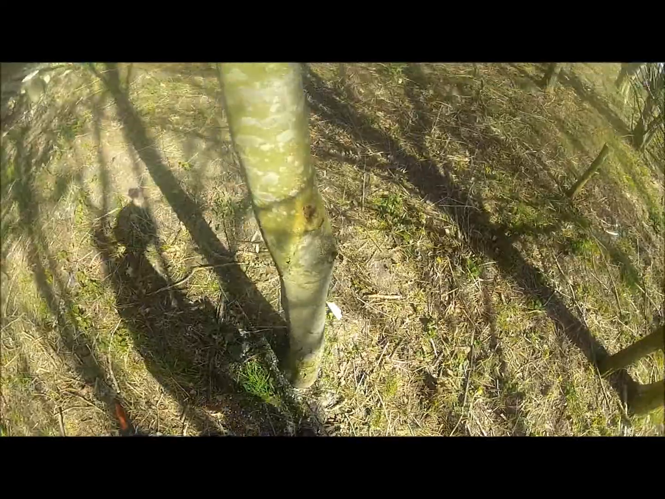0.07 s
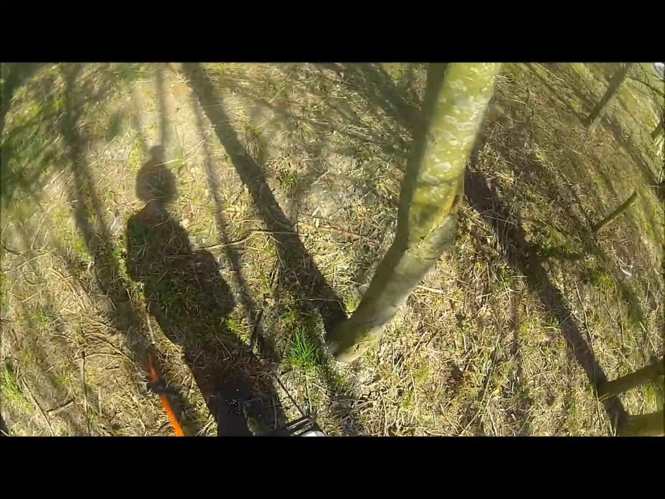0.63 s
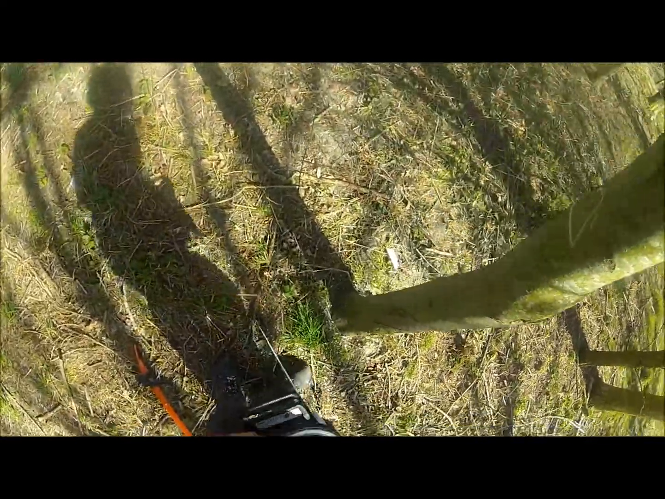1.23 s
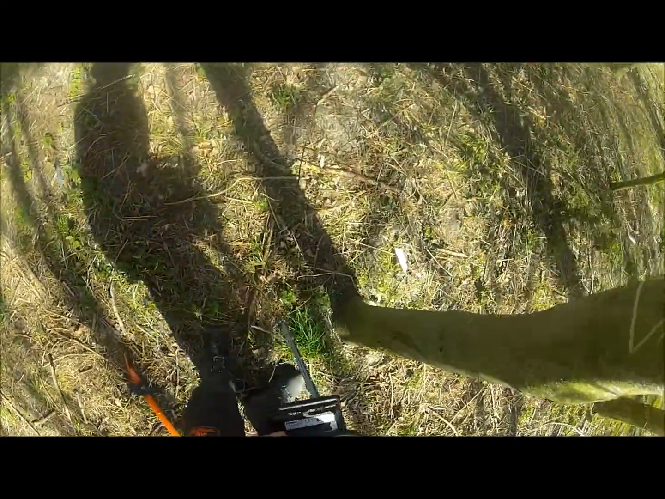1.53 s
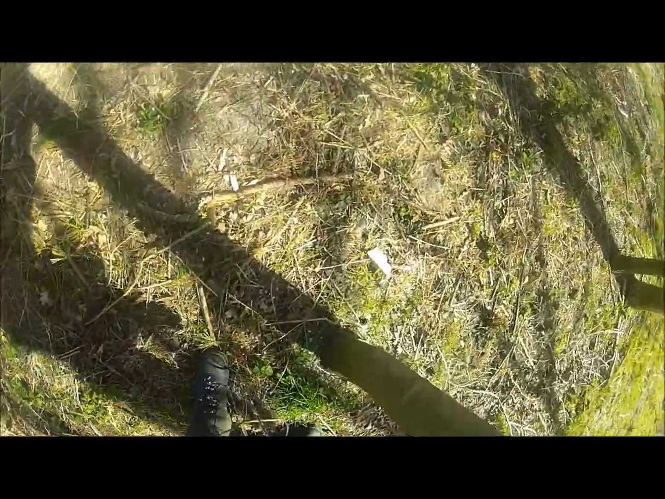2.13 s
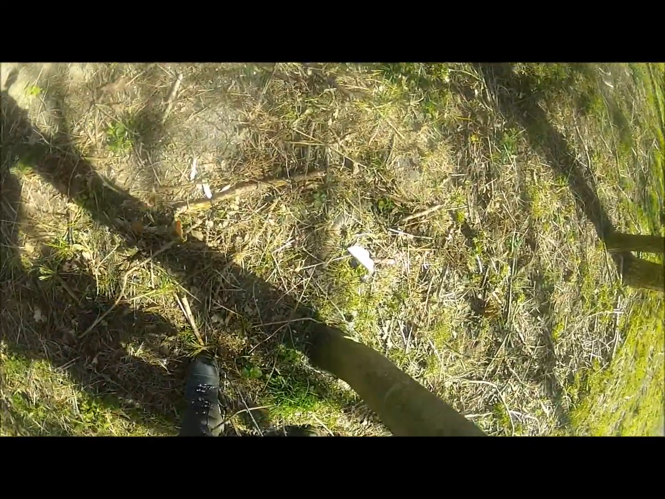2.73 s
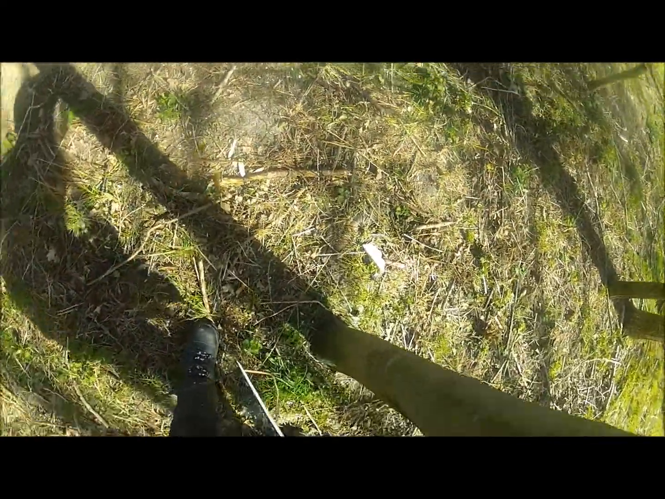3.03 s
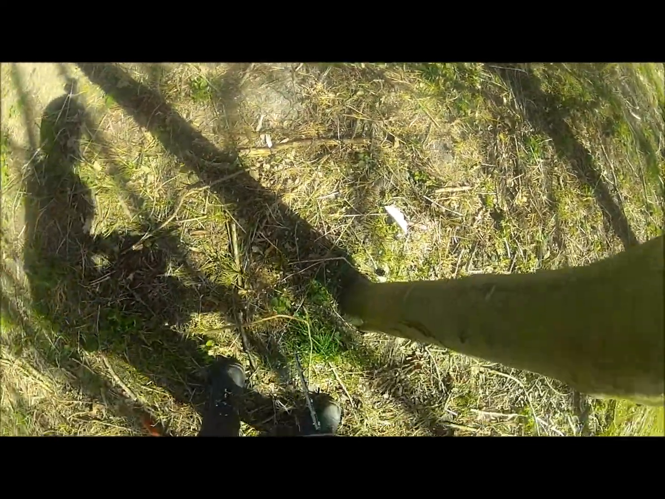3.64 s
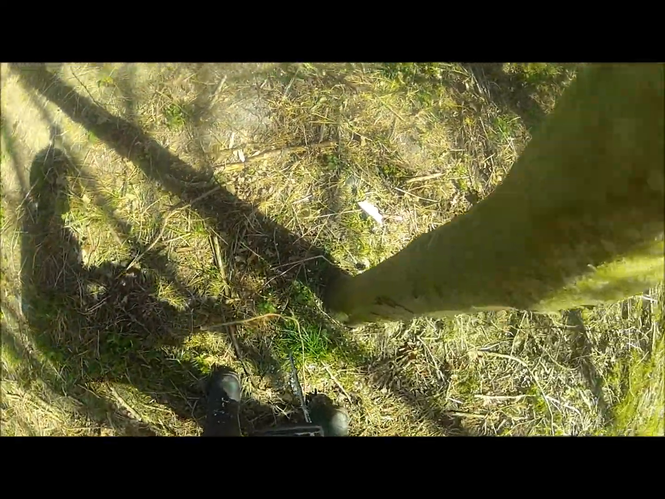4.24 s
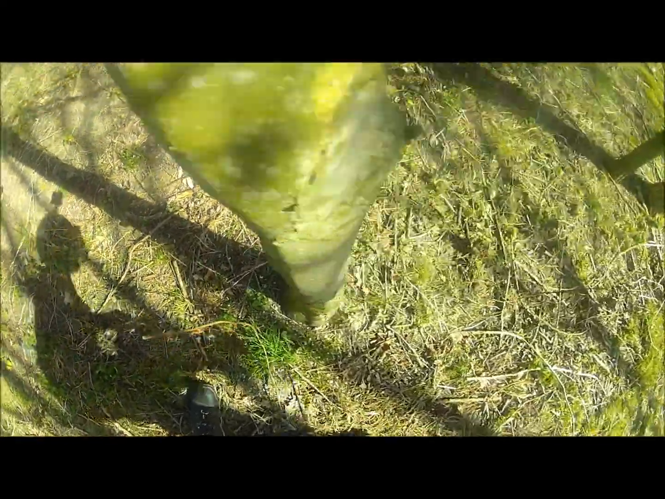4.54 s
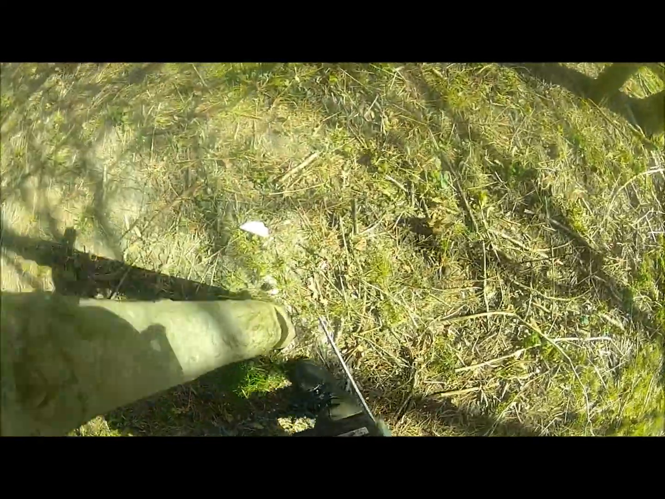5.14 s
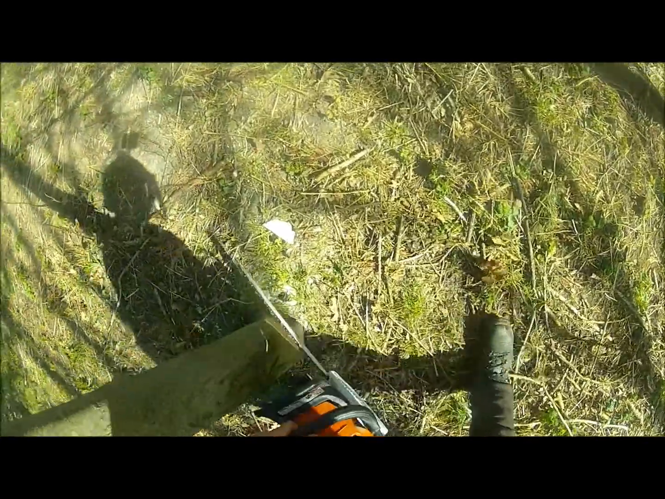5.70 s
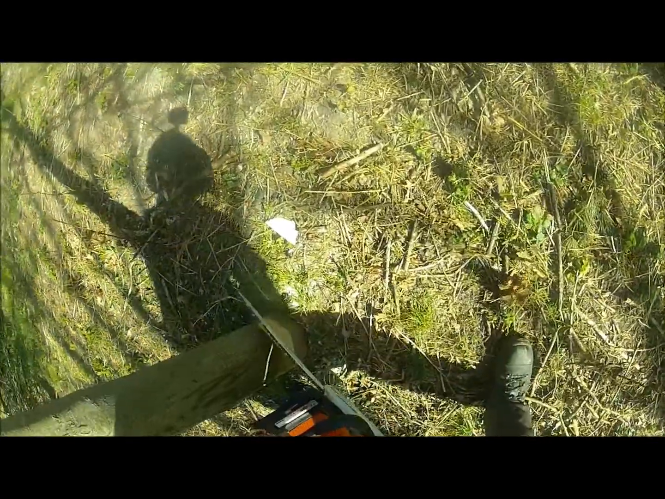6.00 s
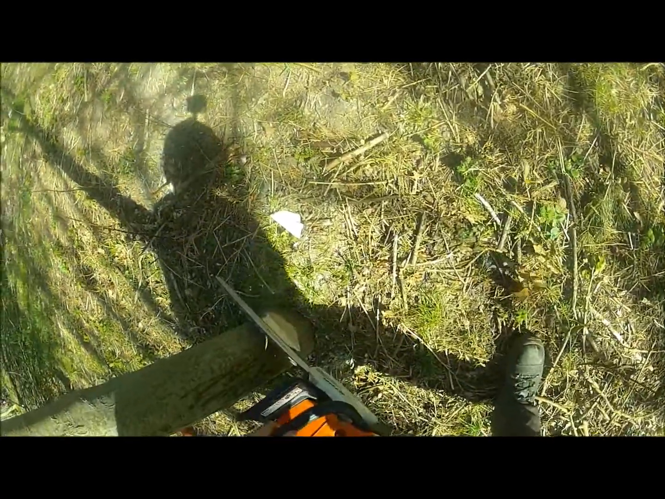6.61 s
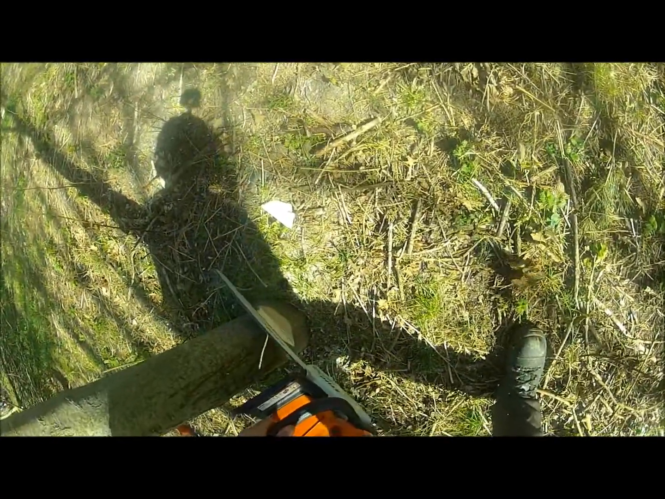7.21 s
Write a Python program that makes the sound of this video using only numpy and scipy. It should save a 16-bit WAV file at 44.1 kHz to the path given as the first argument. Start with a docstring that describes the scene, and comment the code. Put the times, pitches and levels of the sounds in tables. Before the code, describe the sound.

A two-stroke chainsaw idles close by in the open, puffing unevenly with a metallic rattle and occasional slaps of its slack chain. The body-worn microphone picks up a few dull bumps and one sharp snap of its plastic case. After about six seconds the throttle opens and the engine climbs to a loud, high buzz, the teeth just meeting a tree trunk at the end. There is no echo.

```python
"""Chainsaw idling, then cutting

A two-stroke chainsaw idles in the open, firing only every few turns and rattling on each one.
A body-worn camera is jostled and its plastic case snaps as the operator crouches at a trunk.
Then the throttle opens, the engine fires on every turn and the chain races into the wood."""
import sys
import numpy as np
from scipy import signal
from scipy.fft import rfft, irfft
from scipy.io import wavfile
from scipy.ndimage import uniform_filter1d

SR = 44100
rng = np.random.default_rng(int(sys.argv[2]) if len(sys.argv) > 2 else 0)


def generate_wav(sig):
    """Save sig (samples, or channels by samples) to the path in sys.argv[1] as 16-bit PCM at SR."""
    pcm = np.round(np.clip(np.atleast_2d(sig).T, -1, 1) * 32767).astype(np.int16)
    wavfile.write(sys.argv[1], SR, pcm)


N = 320166
TIME = np.arange(N) / SR
CUTOFF_HZ = 15500
PART_THROTTLE_S, FULL_THROTTLE_S = 6.19, 6.511
TOP_SPEED_HZ = 231.3  # engine turns per second


def from_db(db):
    """Turn decibels into a number to multiply by."""
    return 10 ** (np.asarray(db) / 20)


def in_time(rows):
    """Draw each column of a table as a line through time, one value per sample."""
    times, *columns = np.transpose(rows)
    return [np.interp(TIME, times, column) for column in columns]


def evened(x, size=6001):
    """Hold the average (rms) level at one, over a sliding window of size samples."""
    return x / np.sqrt(np.abs(uniform_filter1d(x * x, size)) + 1e-12)


def clicks(times, heights):
    """Single clicks, each shared between the two nearest samples."""
    at = np.clip(np.asarray(times) * SR, 0, N - 2)
    whole = at.astype(int)
    late = at - whole
    return np.bincount(whole, heights * (1 - late), N) + np.bincount(whole + 1, heights * late, N)


def fade(x, decay_s):
    """Give each click a tail that dies away."""
    return signal.lfilter([1], [1, -np.exp(-1 / (decay_s * SR))], x + 1e-18)


def ring(x, pitch_hz, ring_s):
    """Each click starts a pure tone that falls by 60 dB in ring_s."""
    keep = from_db(-60 / (ring_s * SR))
    step = 2 * np.pi * pitch_hz / SR
    return signal.lfilter([0, np.sin(step)], [1, -2 * keep * np.cos(step), keep * keep], x + 1e-18)


def colour(x, tone, resonances=(), size=8192):
    """Filter a sound by a tone curve (how strong each pitch is), plus extra peaks and dips."""
    hz = np.maximum(np.arange(size // 2 + 1) * SR / size, 1)
    points, levels = np.transpose(tone)
    db = np.interp(np.log(hz), np.log(points), levels)
    for centre, width, height in resonances:
        db = db + height * np.exp(-((hz - centre) / width) ** 2)
    # a minimum-phase filter: it rings after a hit, never before
    cepstrum = irfft(np.log(from_db(db)))[:size // 2]
    cepstrum[1:] *= 2
    response = irfft(np.exp(rfft(cepstrum, size)))[:size // 2]
    return signal.oaconvolve(x, response / np.abs(response).max())[:N]


def grit(spread_db):
    """Noise made of tiny impacts of uneven size."""
    noise = rng.standard_normal(N)
    sizes = np.repeat(rng.standard_normal(N // 8 + 1), 8)[:N]
    noise *= from_db(spread_db * sizes)
    return noise / noise.std()


def shower(envelope, tone, resonances=()):
    """Tiny impacts ring through a body; the envelope says how loud they are at each moment."""
    noise = grit(spread_db=-0.5)
    return colour(envelope * noise, tone, resonances) / colour(noise, tone, resonances).std()


def breeze(level_db=-60, band_hz=(20, 105)):
    """Moving air makes a faint rumble, different on the left and the right."""
    band = signal.butter(3, band_hz, "band", fs=SR, output="sos")
    air = signal.sosfilt(band, rng.standard_normal((2, N)))
    return from_db(level_db) * air / air.std()


# Heavy moves that rock the camera mount: start_s, level_db
SWAYS = [(4.70, -32), (5.797, -27)]


def sway(pitch_hz=46, ring_s=0.2):
    """The mount rocks on its strap with a deep thud."""
    start_s, level_db = np.transpose(SWAYS)
    return -ring(clicks(start_s, from_db(level_db)), pitch_hz, ring_s)


# Dull bumps on the mount: start_s, level_db, decay_s
BUMPS = [(.835, -30, 0.089), (2.736, -21.5, 0.036), (3.513, -23, 0.02), (4.694, -17, 0.016),
         (5.736, -19.5, 0.035), (5.781, -25, 0.025), (5.872, -22.5, 0.02)]
# The note of the bumped mount: pitch_hz, level_db, ring_s
MOUNT_NOTES = [(191, -8, 0.071)]
# Tone of a scuff on the mount: pitch_hz, level_db
SCUFF_TONE = [(15, -19), (43, -20), (70, -9), (110, -5), (140, -6.5), (195, 5), (240, -16.5), (400, -26.5),
              (1000, -18), (2000, -50)]
# Low rustle as the operator moves: time_s, level_db
RUSTLE_LEVELS = [(0, -49), (2.8, -47.5), (3.9, -52.5), (6.5, -46)]
# Tone of that rustle: pitch_hz, level_db
RUSTLE_TONE = [(12, -9), (22, -4.5), (42, -2), (70, -12.5), (107, -7), (140, -14), (195, -3), (235, -12.5),
               (500, -15.5), (1200, -59)]


def mount(scuff_gain_db=-8, ring_gain_db=-3, rustle_gain_db=0.5, push_delay_s=0.00635):
    """Bumps make the camera mount ring and scuff, over a low rustle that travels through it."""
    start_s, level_db, _ = np.transpose(BUMPS)
    pushes = clicks(start_s + push_delay_s, from_db(level_db + ring_gain_db))
    rings = sum(from_db(db) * ring(pushes, hz, ring_s) for hz, db, ring_s in MOUNT_NOTES)
    rubbing = sum(from_db(db) * fade(clicks([s], 0.65), decay_s) for s, db, decay_s in BUMPS)
    rustle = from_db(in_time(RUSTLE_LEVELS)[0]) * evened(colour(rng.standard_normal(N), RUSTLE_TONE))
    scuffs = shower(rubbing, SCUFF_TONE)
    return rings + from_db(scuff_gain_db) * scuffs + from_db(rustle_gain_db) * rustle


# Snaps of the plastic case: start_s, level_db
SNAPS = [(2.7427, -22), (4.7005, -29), (5.7536, -0.5), (5.7818, -11.5)]
# The notes the case rings with: pitch_hz, level_db, ring_s
CASE_NOTES = [(1170, -10, 0.0037), (1780, 5.5, 0.0096), (2270, -1.5, 0.0076), (5660, -9.5, 0.0017),
              (10080, -11.5, 0.016), (13730, -13, 0.0094)]


def case_snaps(gain_db=-5):
    """Each snap rings the plastic case; neighbouring notes start in opposite directions."""
    start_s, level_db = np.transpose(SNAPS)
    hits = clicks(np.round(start_s * SR) / SR, from_db(level_db + gain_db))
    return sum((-1) ** k * from_db(db) * ring(hits, hz, ring_s)
               for k, (hz, db, ring_s) in enumerate(CASE_NOTES))


def engine_speed(idle_hz=50.68, sag_hz_per_s=0.44, part_speed_hz=70.5, run_up_s=0.61, flywheel_s=0.08):
    """Turns per second: a wandering, sinking idle, a small squeeze of the trigger, then full speed."""
    wander = 1.03 * np.cos(2 * np.pi * (TIME - 0.164) / 0.965)
    stumble = 2.6 * np.exp(-((TIME - 3.73) / 0.28) ** 2)  # the engine slows once and recovers
    idle = idle_hz - sag_hz_per_s * TIME + wander - stumble
    squeezed = np.clip((TIME - PART_THROTTLE_S) / 0.17, 0, 1)
    run_up = 1 - np.clip(1 - (TIME - FULL_THROTTLE_S) / run_up_s, 0, 1) ** 2
    run_up = uniform_filter1d(run_up, int(flywheel_s * SR))  # the flywheel's weight rounds off the speed-up
    return idle + (part_speed_hz - idle) * squeezed + (TOP_SPEED_HZ - part_speed_hz) * run_up


def clutch_grip(take_up_s=0.35):
    """How firmly the clutch pulls the chain along, from 0 to 1."""
    return np.clip((TIME - PART_THROTTLE_S) / take_up_s, 0, 1)


# The strongest firings of the idling engine: start_s, level_db
FIRINGS = [(.145, -36), (.418, -41), (1.181, -42), (1.666, -43.5), (1.983, -40), (2.138, -38),
           (2.356, -36.5), (2.436, -37), (2.745, -37), (3.064, -40), (3.223, -38), (3.43, -41),
           (3.626, -41.5), (3.716, -39), (4.005, -36.5), (4.271, -40.5), (4.435, -38.5), (4.645, -35.5),
           (5.019, -42), (5.557, -43.5), (5.847, -38), (6.008, -40), (6.091, -38), (6.283, -36)]


def idle_firings(turns, weak_gap_s=0.08, strong_gain_db=2, weak_db=-45, spread_db=1.0):
    """One click per idle firing: between the strong ones, every few turns fire weakly."""
    strong_s, strong_db = np.transpose(FIRINGS)
    weak_s = np.concatenate([np.linspace(a, b, max(round((b - a) / weak_gap_s), 1) + 1)[1:-1]
                             for a, b in zip([0, *strong_s], strong_s)])
    weak_s = turns[np.abs(turns - weak_s[:, None]).argmin(axis=1)]  # move each to the nearest turn
    weak = clicks(weak_s, from_db(weak_db + spread_db * rng.standard_normal(len(weak_s))))
    return clicks(strong_s, from_db(strong_db + strong_gain_db)) + weak


def turn_times(speed, surge=0.0801):
    """When each turn begins; a strong firing kicks the crankshaft ahead, then it coasts."""
    start_s, level_db = np.transpose(FIRINGS)
    kick = fade(clicks(start_s, from_db(level_db - level_db.mean())), decay_s=0.05)
    kick -= uniform_filter1d(kick, size=7001)
    count = np.cumsum(speed * (1 + surge * kick * (TIME < FULL_THROTTLE_S))) / SR
    # make every strong firing start a turn
    offsets = np.unwrap(np.interp(start_s, TIME, count) % 1, period=1)
    count -= np.interp(TIME, start_s, offsets)
    return np.interp(np.arange(1, int(count[-1]) + 1), count, TIME)


def knocks(turns, speed, phase, spread_db, jitter):
    """One uneven click per turn; phase (its delay) and jitter (its scatter) are shares of a turn."""
    turn_s = 1 / np.interp(turns, TIME, speed)
    timing, strength = rng.standard_normal((len(turns), 2)).T
    return clicks(turns + turn_s * (phase + jitter * timing), from_db(spread_db * strength))


# Thump of the air box, where the engine breathes in: time_s, level_db
INTAKE_LEVELS = [(0, -55), (1.1, -51), (5.6, -50.5), (6.1, -57)]
# Tone of that thump: pitch_hz, level_db
INTAKE_TONE = [(30, -14), (48, -7.5), (80, -17.5), (110, -19.5), (170, -22), (250, -5), (330, -1.5),
               (400, -4), (480, -17), (800, -36)]


def intake(turns, speed, load):
    """The air box gives a low thump on every turn, fading as the engine speeds up."""
    gulps = knocks(turns, speed, phase=-0.06, spread_db=1.0, jitter=0.002)
    return from_db(in_time(INTAKE_LEVELS)[0]) * evened(colour(gulps, INTAKE_TONE)) * (1 - load)


# Four notes of the cooling fins and covers: pitch_hz, ring_s, gain_db
PINGS = [(1750, 0.04, -2.5), (2716, 0.025, -2.5), (3546, 0.034, -4.5), (4830, 0.015, -2)]
# Their levels as the saw is turned: time_s, first_db, second_db, third_db, fourth_db
PING_LEVELS = [(0, -46, -62, -59, -57), (2.3, -41.5, -55, -50, -61), (3.3, -49.5, -54.5, -46, -52),
               (4.3, -54, -48, -48, -52), (5.7, -49.5, -43.5, -57, -56)]


def pings(turns, speed, load):
    """At idle the piston's slap rings fins and covers; how the saw is held decides which stands out."""
    out = np.zeros(N)
    for (pitch_hz, ring_s, gain_db), level_db in zip(PINGS, in_time(PING_LEVELS)):
        slaps = knocks(turns, speed, phase=-0.2, spread_db=1.7, jitter=0.0401)
        out += from_db(gain_db + level_db) * evened(ring(slaps, pitch_hz, ring_s))
    return out * (1 - load)


def small_resonances(lowest_hz=5600, width_hz=36, max_height_db=8, count=56):
    """The camera's case adds many narrow peaks, scattered across the treble."""
    places, heights = rng.random((count, 2)).T
    centres = lowest_hz + (CUTOFF_HZ - lowest_hz) * (np.arange(count) + places) / count
    return [(hz, width_hz, max_height_db * share) for hz, share in zip(centres, heights)]


# Idle rattle as the saw is turned: time_s, low_clatter_db, high_clatter_db, sizzle_db
IDLE_RATTLE = [(.88, -43.5, -42.5, -45.5), (2.3, -41, -42, -44), (3.14, -40.5, -41, -43.5),
               (3.65, -44, -43, -45.5), (5.2, -43, -42, -44.5), (6.1, -43, -39.5, -42)]
# How those three grow with speed, one row each: gain_db, full_rise_db, reach_octaves
RATTLE_RISE = [(1.02, 19, 1.1), (-0.52, 18.5, 1.58), (-0.1, 19.5, 1.6)]


def rattle_levels(speed, idle_hz=50, slip=0.41):
    """The rattle's three levels in dB rise with speed and flatten out; a slipping clutch delays this."""
    octaves = np.maximum(np.log2(speed / idle_hz), 0)
    octaves *= 1 - slip * (1 - clutch_grip())
    return [idle_db + gain_db + rise_db * np.tanh(octaves / reach)
            for idle_db, (gain_db, rise_db, reach) in zip(in_time(IDLE_RATTLE), RATTLE_RISE)]


# Tone of the clattering parts: pitch_hz, level_db
CLATTER_TONE = [(250, -32.5), (500, -18), (620, -14.5), (1400, -11), (1700, -1.5), (3000, -5), (4000, -11),
                (4500, -10), (6000, -56.5)]
# Tone of the chain's bright sizzle: pitch_hz, level_db
SIZZLE_TONE = [(2500, -77), (3900, 2), (4500, -2), (9500, 0), (10400, -10.5), (10800, -18.5),
               (13100, -41.5), (14000, -18), (15200, -17.5)]
# Peaks and dips that colour the clatter and sizzle, from the saw's parts and the camera's case:
# pitch_hz, width_hz, height_db
RATTLE_RESONANCES = [(694, 23, 11.5), (940, 99, 6), (1288, 73, -14), (2104, 940, 2.5), (2465, 24, 9),
                     (2720, 86, 5), (3021, 83, 7.5), (3665, 280, 8), (4173, 207, -8), (4774, 200, 11),
                     (5344, 110, 8), (6004, 426, -11), (7270, 127, 6.5), (7800, 250, -11.5),
                     (8240, 136, 3.5), (10210, 380, 6.5), (13770, 2150, 18.5)]


def rattle(turns, speed, load, pulses, firings, shake_db=31, split_hz=2300):
    """Piston, clutch and chain rattle in a burst on each turn; at speed the firing buzzes through them."""
    low_db, high_db, sizzle_db = rattle_levels(speed)
    peaks = RATTLE_RESONANCES + small_resonances()
    piston = knocks(turns, speed, phase=-0.3, spread_db=1.5, jitter=0.0253)
    rebound = knocks(turns, speed, phase=-0.097, spread_db=2.0, jitter=0.052)
    # turns that fire shake the saw harder
    blows = piston + 0.5 * rebound + from_db(shake_db) * firings
    # each burst builds up as the loose parts meet, then dies away
    bursts = fade(blows, decay_s=0.0025) - fade(blows, decay_s=0.0017)
    shaking = bursts + 0.096 + 0.88 * load  # a steady part fills the gaps
    clatter = evened(colour((shaking + 0.043) * grit(spread_db=2.0), CLATTER_TONE, peaks))
    sizzle = evened(colour(shaking * grit(spread_db=1.5) + 1.6 * piston, SIZZLE_TONE, peaks))
    clatter += 1.3 * load * evened(colour(pulses, CLATTER_TONE, peaks))
    sizzle += 0.26 * load * evened(colour(pulses, SIZZLE_TONE, peaks))
    low, high = (evened(signal.sosfilt(signal.butter(5, split_hz, kind, fs=SR, output="sos"), clatter))
                 for kind in ("low", "high"))
    return from_db(low_db) * low + from_db(high_db) * high + from_db(sizzle_db) * evened(sizzle)


# Slaps of the slack chain: start_s, body_db, treble_db
SLAPS = [(1.039, -35, -47), (1.8605, -33, -39), (1.9342, -27.5, -31.5), (1.9814, -27, -41),
         (2.059, -32.5, -48), (2.272, -31, -52), (2.7402, -30, -39), (3.7154, -30.5, -40),
         (4.643, -35, -52), (5.237, -30.5, -43), (5.492, -31, -44), (5.925, -26, -33), (6.089, -26.5, -42)]


def chain_slaps(treble_gain_db=4.5, decay_s=0.0035):
    """The slack chain hits its guide bar in short metallic bursts, some dull and some bright."""
    start_s, body_db, treble_db = np.transpose(SLAPS)
    return sum(shower(fade(clicks(start_s, from_db(db)), decay_s), tone, RATTLE_RESONANCES)
               for db, tone in [(body_db, CLATTER_TONE), (treble_db + treble_gain_db, SIZZLE_TONE)])


# Where overtones of the engine ring the bar or housing: speed_multiple, pitch_hz, width_hz, level_db
WHINES = [(5, 486, 70, -35), (7, 526, 64, -32.5), (6, 986, 91, -27.5), (7, 1552, 62, -23.5),
          (8, 1700, 55, -36), (10, 2070, 92, -19.5), (12, 2030, 95, -27), (13, 2330, 130, -28),
          (14, 2000, 122, -27), (14, 2334, 120, -23), (14, 2680, 96, -23.5), (14, 3074, 70, -29),
          (15, 2060, 160, -26.5), (17, 3300, 130, -26)]


def whine(speed, waver=0.36):
    """As the clutch grips, multiples of the engine speed swell and waver while passing a resonance."""
    angle = 2 * np.pi * np.cumsum(speed) / SR
    out = np.zeros(N)
    for multiple, pitch_hz, width_hz, level_db in WHINES:
        swell = from_db(level_db) * np.exp(-((multiple * speed - pitch_hz) / width_hz) ** 2)
        flutter = uniform_filter1d(rng.standard_normal(N), size=400)
        out += swell * np.sqrt(2) * np.sin(multiple * angle) * (1 + waver * flutter / flutter.std())
    return out * clutch_grip() ** 2


# Tone of the teeth biting the trunk: pitch_hz, level_db
BITE_TONE = [(2100, -22.5), (2380, -1), (2460, 0), (2550, 0), (2630, 4), (2750, -20), (3200, -34)]


def bite(start_s=7.05, attack_s=0.02, level_db=-24.5):
    """The teeth meet the wood and make the bar ring harshly."""
    contact = np.clip((TIME - start_s) / attack_s, 0, 1)
    return from_db(level_db) * shower(contact, BITE_TONE)


# Tone of an idle puff: pitch_hz, level_db
PUFF_TONE = [(300, -14.5), (500, 2), (780, -11), (980, 12), (1070, -4), (1160, 4.5), (1300, -14),
             (2500, -39)]


def idle_puffs(firings, gain_db=-5):
    """Each idle firing leaves the muffler as a short, rough puff."""
    return from_db(gain_db) * shower(fade(firings, decay_s=0.013), PUFF_TONE)


# Strength of three firings in a row at speed: level_db
FIRING_PATTERN = [0.5, 1, 1.5]


def exhaust_pulses(turns, speed):
    """Steady firing pushes out one pulse of gas per turn, in a repeating pattern of three."""
    pattern_db = np.interp(TIME, turns, np.resize(FIRING_PATTERN, len(turns)))
    return knocks(turns, speed, phase=0, spread_db=0.3, jitter=0.0045) * from_db(pattern_db)


# Tone of the muffler: pitch_hz, level_db
MUFFLER_TONE = [(60, -19), (110, 11), (230, 3), (340, -3), (470, 5.5), (620, 5.5), (700, 13), (780, -13.5),
                (930, -0.5), (1160, -2), (1300, 2), (1800, -37.5)]


def exhaust_note(pulses, speed, base_db=-27.5, db_per_octave=8, tuned_db=4.5, tuned_width_hz=6.8):
    """The muffler's note sets in as every turn begins to fire, grows with speed and peaks when in tune."""
    steady_firing = np.clip((speed - 54) / 30, 0, 1)
    in_tune = np.exp(-((speed - TOP_SPEED_HZ) / tuned_width_hz) ** 2)
    level_db = base_db + db_per_octave * np.log2(speed / TOP_SPEED_HZ) + tuned_db * in_tune
    return steady_firing * from_db(level_db) * evened(colour(pulses, MUFFLER_TONE), size=2501)


def scene():
    """The saw is close and straight ahead, with no walls to echo it."""
    speed = engine_speed()
    load = np.clip((speed - 55) / 130, 0, 1)  # 0 at idle, 1 when racing
    turns = turn_times(speed)
    firings = idle_firings(turns)
    pulses = exhaust_pulses(turns, speed)
    engine = exhaust_note(pulses, speed) + idle_puffs(firings) + intake(turns, speed, load)
    metal = rattle(turns, speed, load, pulses, firings) + pings(turns, speed, load) + chain_slaps()
    return engine + metal + whine(speed) + bite() + mount() + sway() + case_snaps() + breeze()


def record(dry):
    """The highest treble is cut off steeply."""
    return signal.sosfilt(signal.ellip(10, .1, 80, CUTOFF_HZ, fs=SR, output="sos"), dry)


dry = scene()
out = record(dry)
generate_wav(out)
```